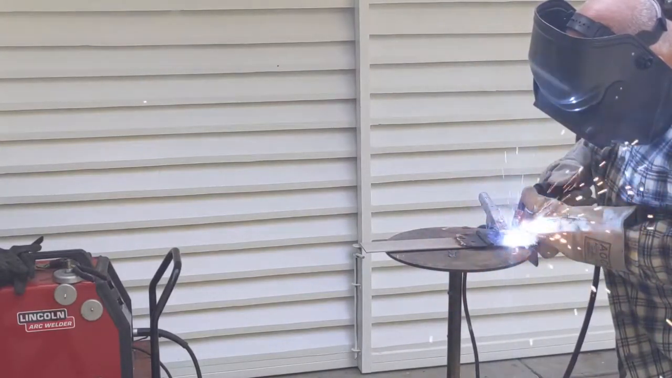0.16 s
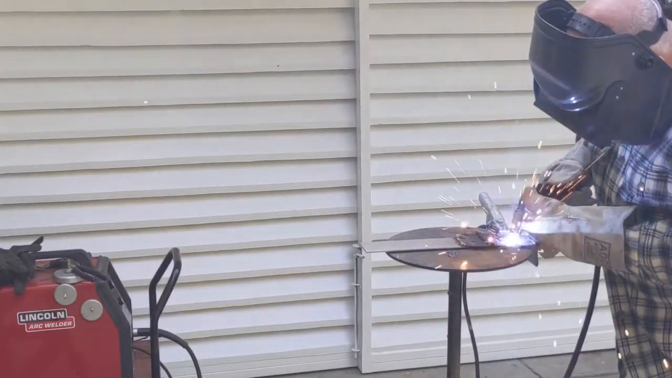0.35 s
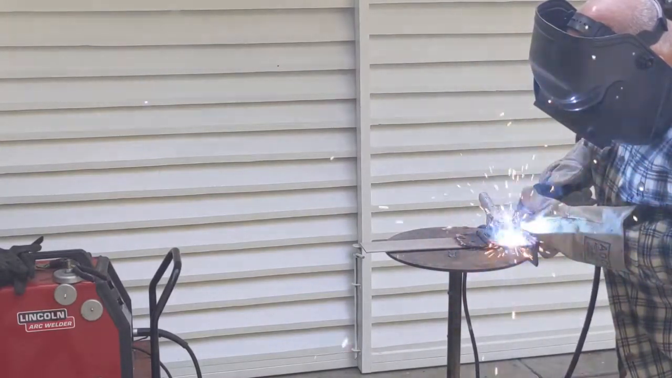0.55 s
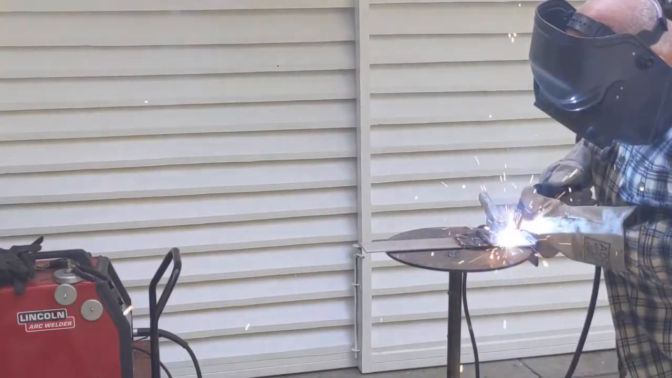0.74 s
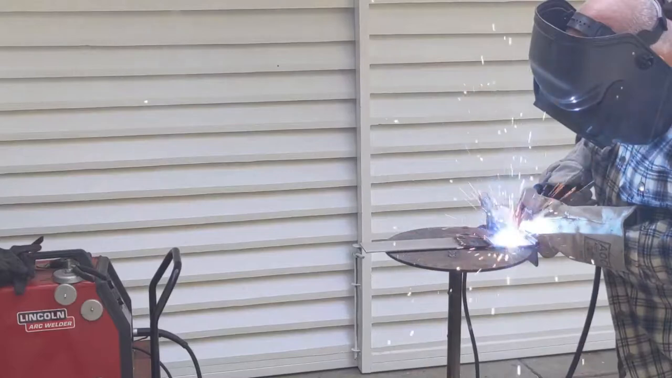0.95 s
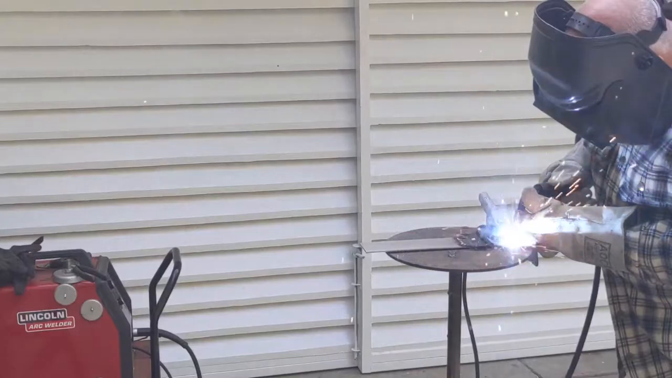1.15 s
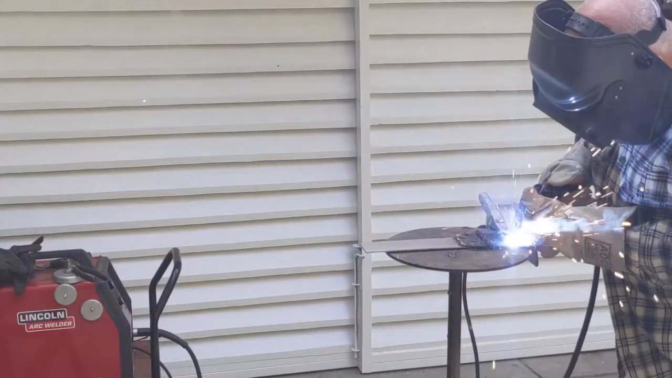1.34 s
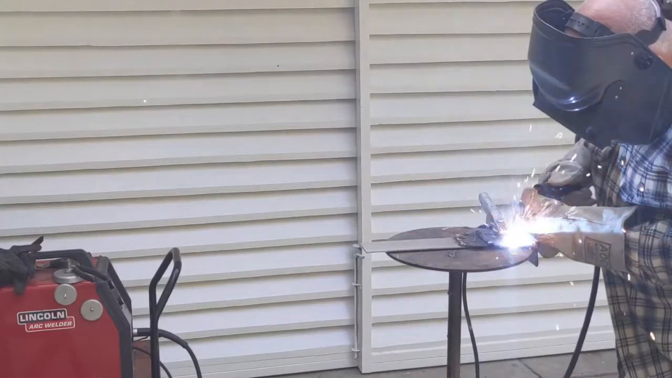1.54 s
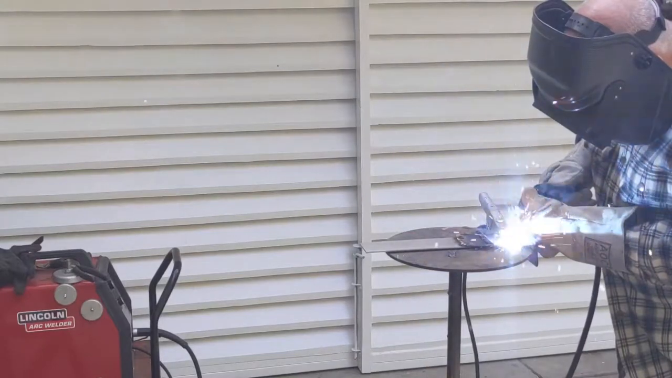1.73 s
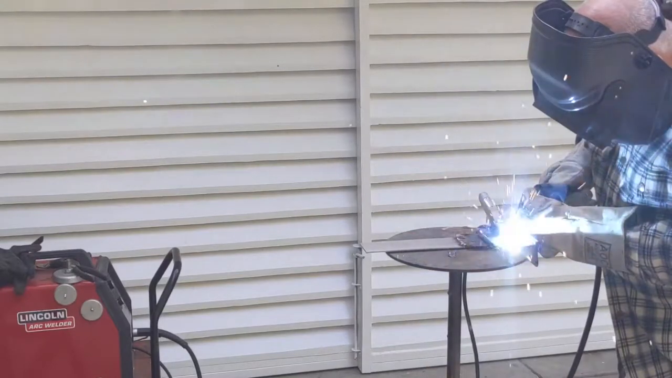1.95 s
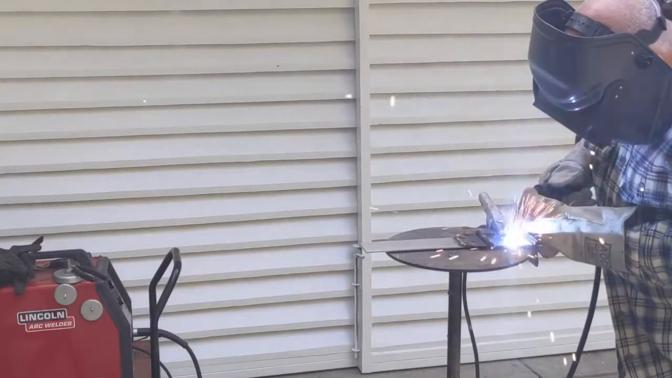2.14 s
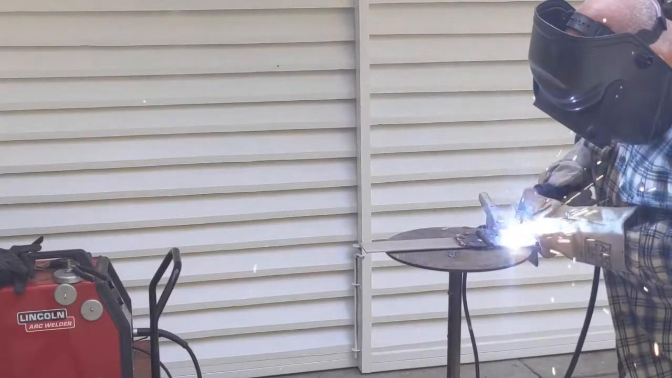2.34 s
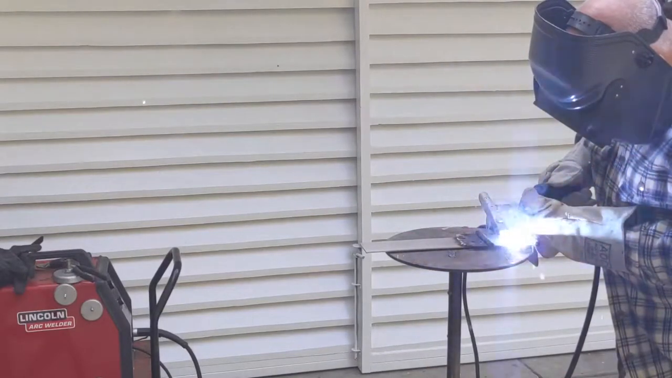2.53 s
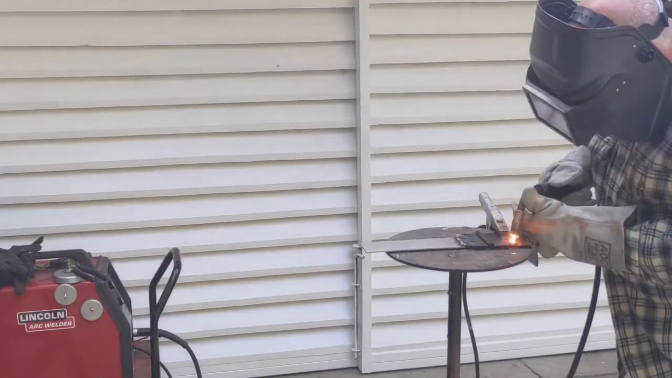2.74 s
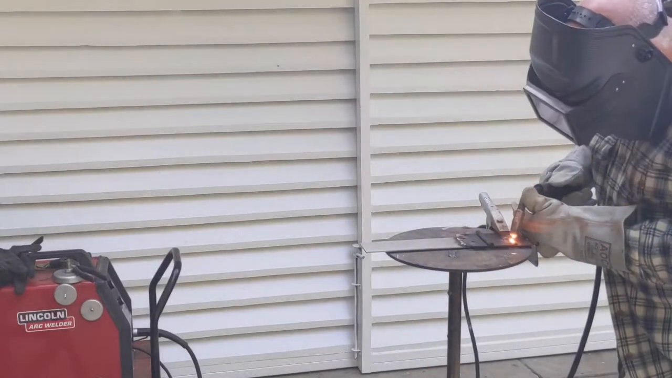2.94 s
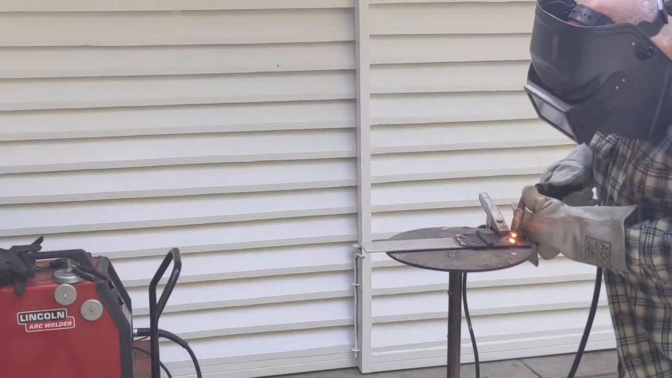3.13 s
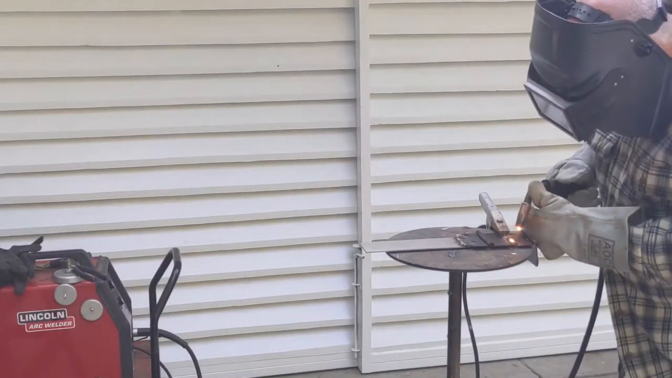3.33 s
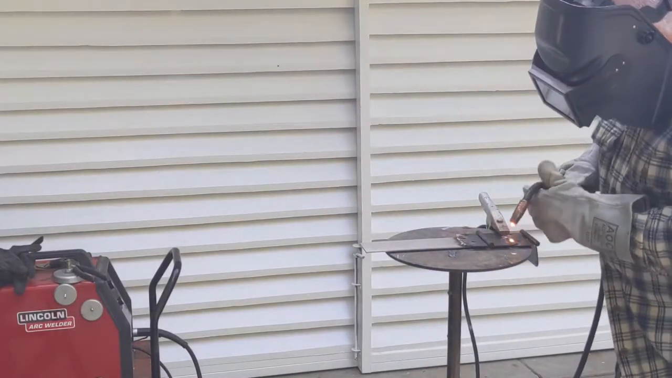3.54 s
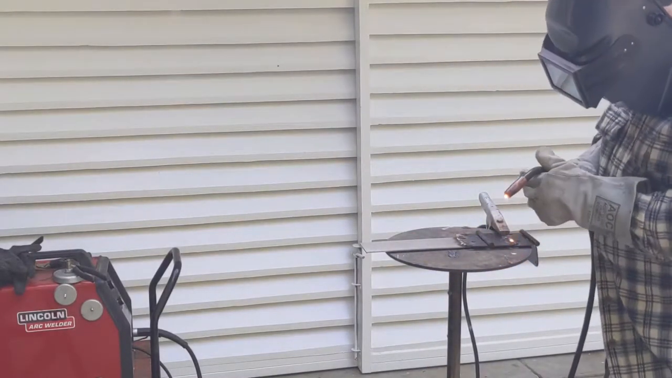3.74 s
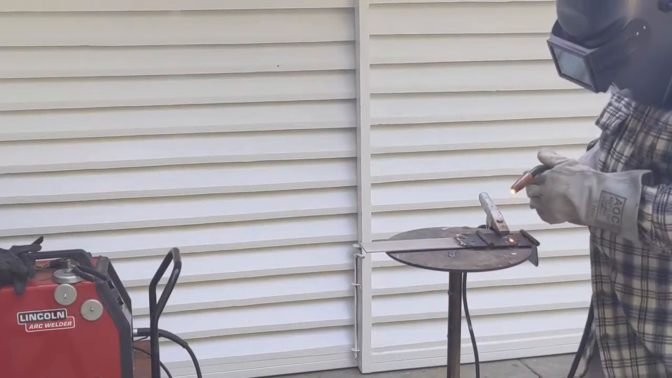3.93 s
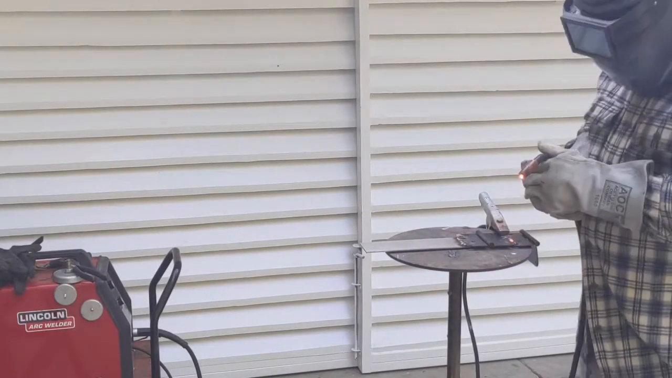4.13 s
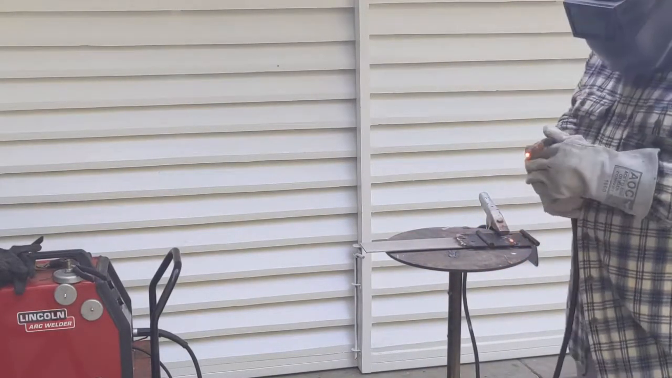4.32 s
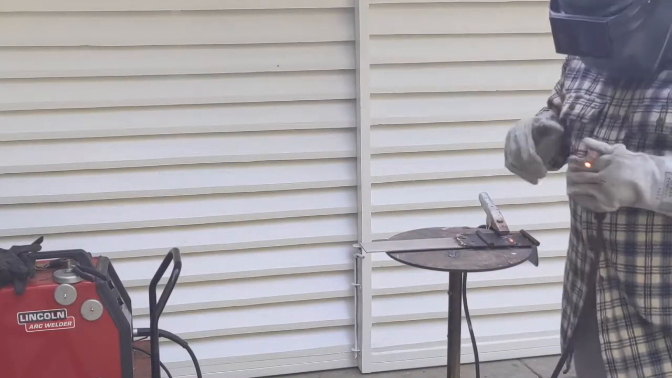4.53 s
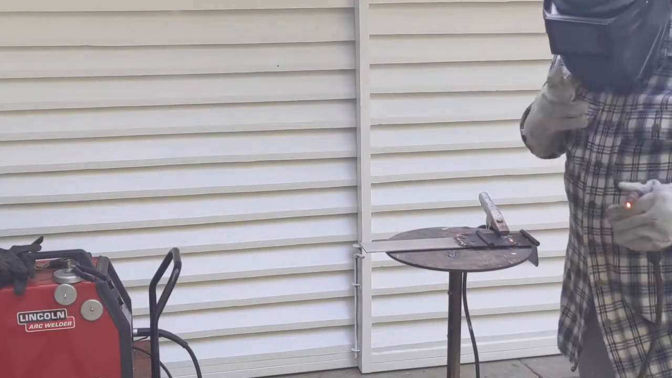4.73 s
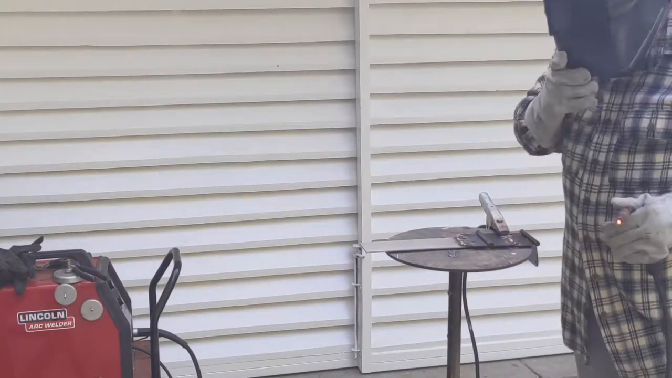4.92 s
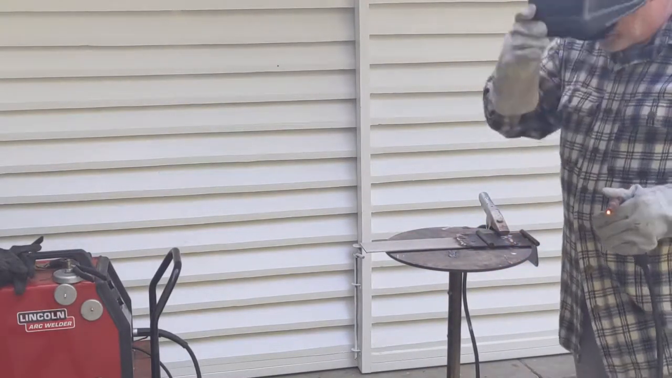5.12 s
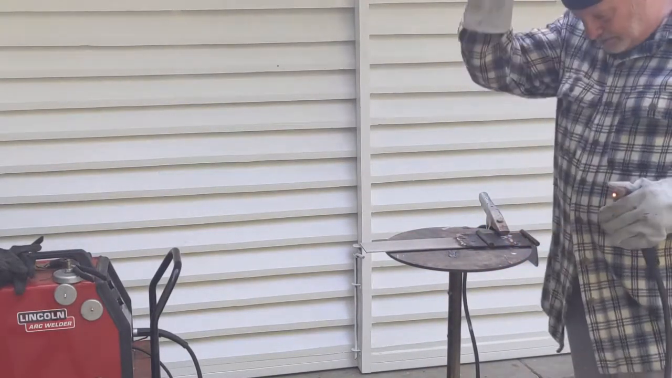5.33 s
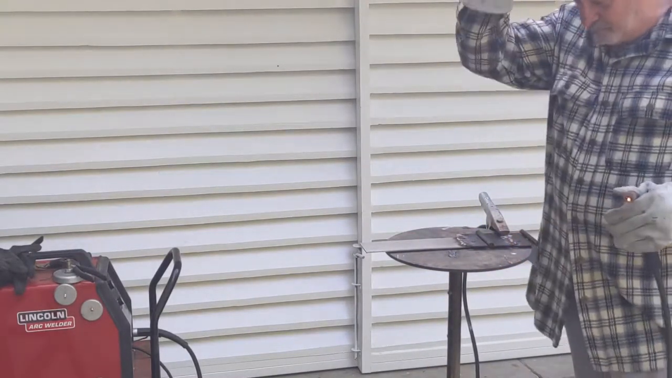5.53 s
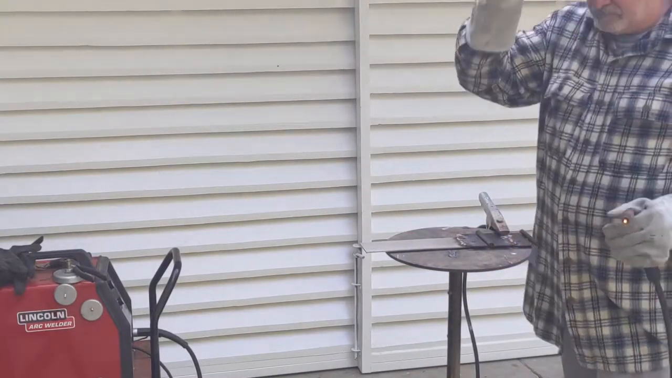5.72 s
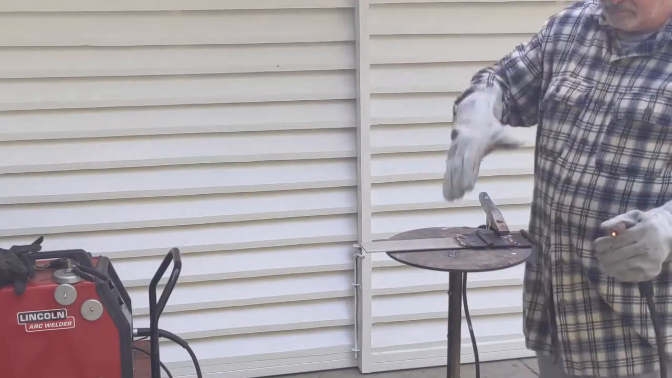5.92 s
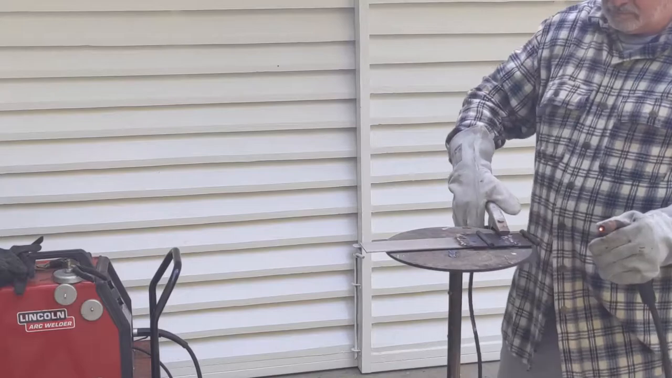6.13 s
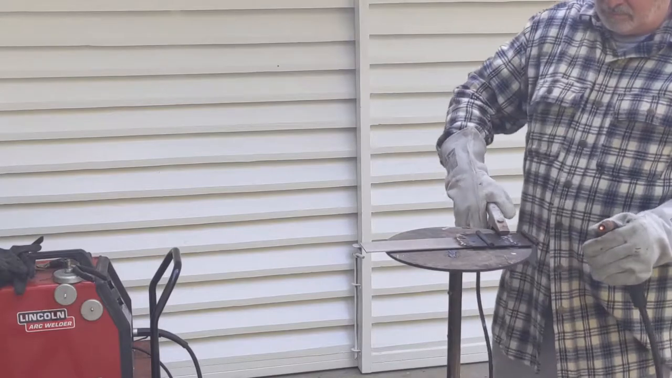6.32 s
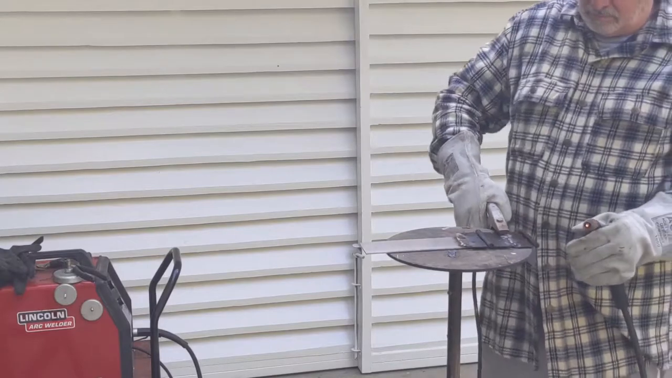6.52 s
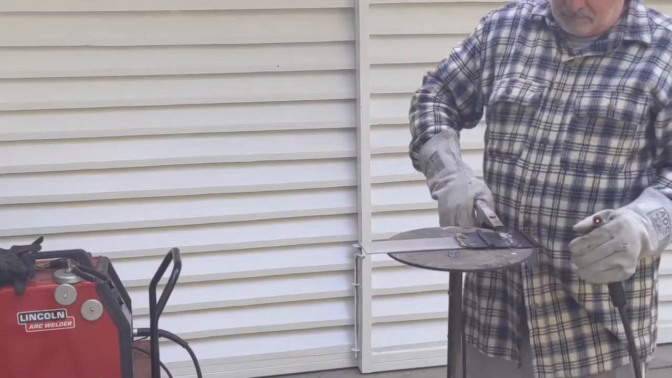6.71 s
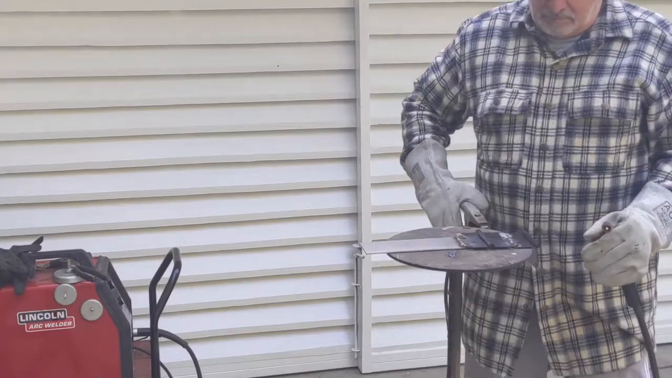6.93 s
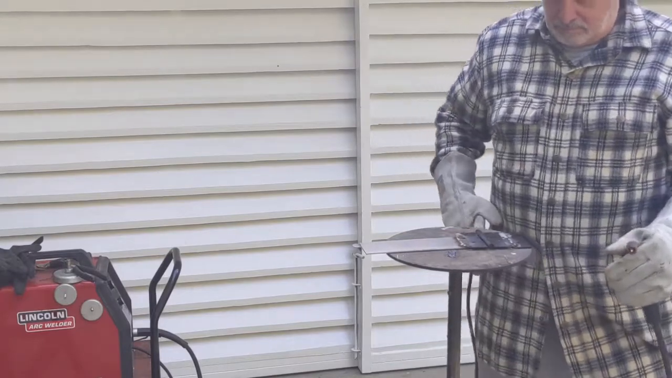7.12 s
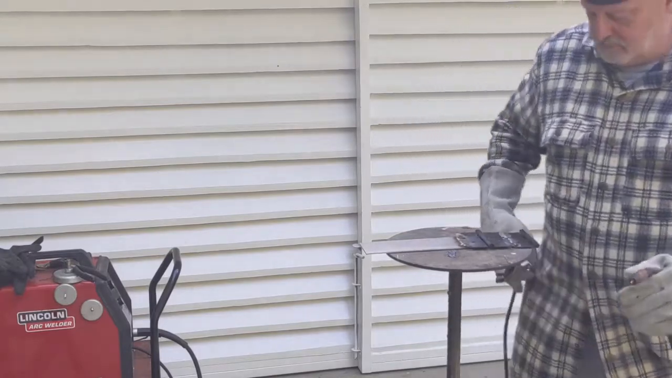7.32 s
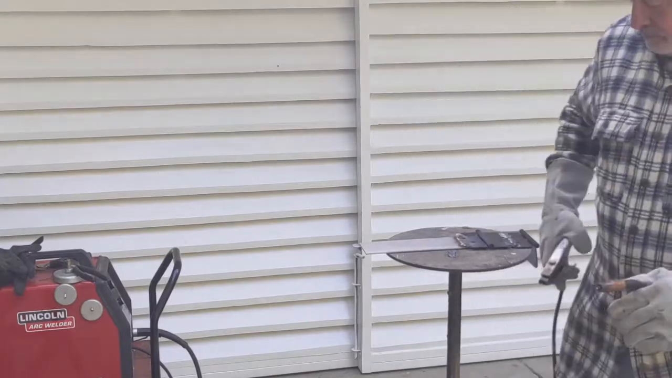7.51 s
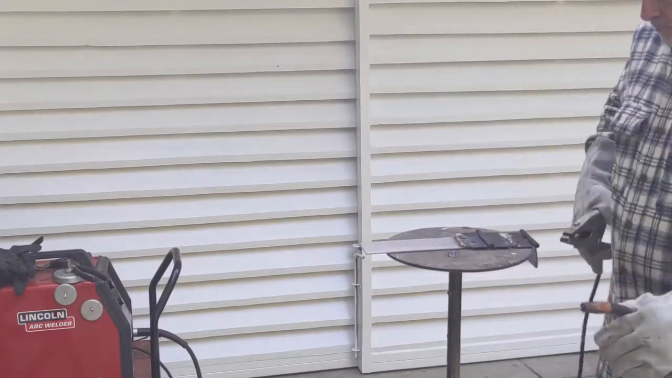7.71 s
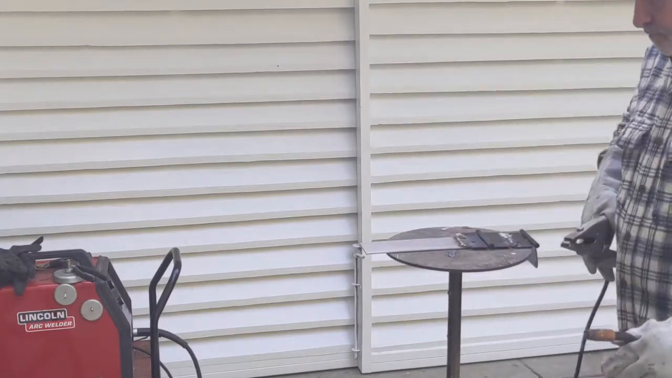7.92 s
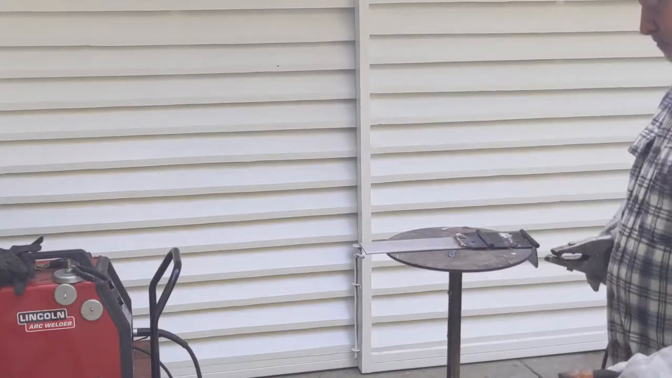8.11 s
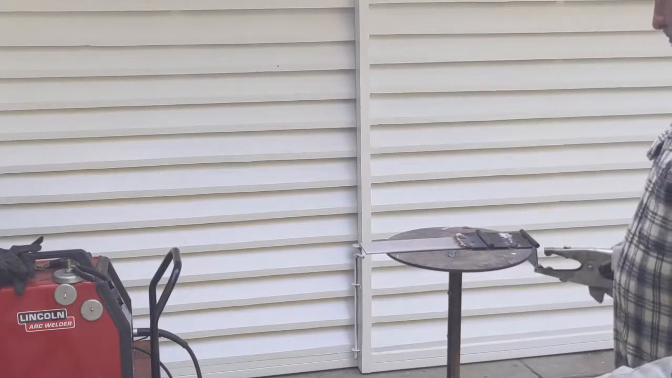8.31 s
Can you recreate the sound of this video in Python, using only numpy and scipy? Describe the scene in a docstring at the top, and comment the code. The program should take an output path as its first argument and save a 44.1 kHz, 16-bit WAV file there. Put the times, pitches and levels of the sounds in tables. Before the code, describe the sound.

A fierce, stuttering welding arc snaps and sizzles, then stops, leaving a steady machine fan, quiet gear handling, small metal ticks and faint bird chips.

```python
"""Outdoors, at a small steel table in front of a house wall: wire welding heard by a pair of microphones.
The wire short-circuits about 120 times a second, each time with a snap; the plasma sizzles, hot gas puffs low.
Then the welder's fan, there all along as blade tones over rushing air, speeds up and hums on.
Over it the helmet is pushed up and rattles, the earth clamp comes off and rings the table, gloves, cloth and
a shoe scuff, small metal ticks, a thin whistle sets in; far off, a bird chips in short rising tones."""
import sys
import numpy as np
from scipy import signal
from scipy.fft import rfft, irfft
from scipy.io import wavfile
from scipy.ndimage import uniform_filter1d

SR = 44100
rng = np.random.default_rng(int(sys.argv[2]) if len(sys.argv) > 2 else 0)


def store_pcm(level_fs):
    """Save levels as 16-bit WAV."""
    pcm = np.round(np.clip(level_fs, -1, 1) * 32767).astype(np.int16)
    wavfile.write(sys.argv[1], SR, np.atleast_2d(pcm).T)


N = 368676
TIME = np.arange(N) / SR

# echoes from the table top, the welder's body, the ground and the wall: (delay [ms], strength [gain])
ARC_ECHOES = [(.47, 0.074), (.74, 0.17), (1.15, 0.074), (3.95, 0.23), (5.1, 0.145), (6.85, 0.13),
              (11.4, 0.088), (12.5, 0.093), (12.95, 0.3), (16.9, 0.13), (18.1, 0.055)]
# phase by which the left microphone leads: (frequency [Hz], lead [rad])
ARC_LEFT_LEAD = [(300, 0), (1700, .35), (4200, 1.4), (6200, 2.2), (9000, 4.1), (12000, 6.1), (15000, 8.6)]
# balance of the arc between the microphones: (frequency [Hz], left minus right [dB])
ARC_BALANCE = [(60, 12.5), (200, 4), (1300, 5), (4200, 2), (7000, 0), (8200, -3.5), (10800, 0), (12500, -4),
               (13500, 10.5), (15300, 10.5)]
# colour of the fluttering gas: (frequency [Hz], relative level [dB])
FLUTTER_COLOUR = [(20, -12), (45, 12), (65, 16.5), (120, 5), (230, 13), (450, -5.5), (900, -4.5),
                  (3000, -92)]


def arc(scatter=0.016, smear_hz=7000, flutter_db=-2.5, eddy_db=-7.0):
    """The arc with its near echoes; the direct sound reaches the left microphone first."""
    burn = burning()
    crackle = snaps() + sizzle(burn)
    hz = np.fft.rfftfreq(N, 1 / SR)
    delay_ms, strength = np.transpose(ARC_ECHOES)
    channels = []
    for side in (0, 1):
        arrival_ms = delay_ms * (1 + scatter * rng.standard_normal(len(delay_ms)))  # echoes come from all sides
        echo = sum(g * np.exp(-2j * np.pi * hz * ms / 1000) for ms, g in zip(arrival_ms, strength))
        echo = echo / (1 + hz / smear_hz) ** .5  # duller than the direct sound
        direct = np.exp(-1j * side * read(ARC_LEFT_LEAD, hz))
        # part of the rumble differs between the microphones
        eddies = gain_of(eddy_db) * burn * noise(FLUTTER_COLOUR, N)
        channels.append(eddies + irfft(rfft(crackle) * (direct + echo), N))
    flutter = gain_of(flutter_db) * burn * noise(FLUTTER_COLOUR, N)  # the hot gas flutters between puffs
    bass = puffs() + flutter
    sound = np.array(channels) + yard(crackle, wet_db=-10) + bass + yard(bass, wet_db=-16.0)
    balance_db = np.outer([.5, -.5], read(ARC_BALANCE, hz))
    return irfft(rfft(sound) * gain_of(balance_db), N)


# a big drop hangs on the wire, then bursts with a loud pop: (time [s], level before the snap gain [dB])
POPS = [(.0804, -7.5), (0.1216, -15), (.417, -9.5), (0.8242, -5), (1.3625, -13), (1.425, -26.5),
        (1.5853, -9), (1.609, -11), (1.6555, -7.5), (1.861, -8.5), (2.0841, -11.5), (2.392, -14),
        (2.4342, -8)]
# colour of each snap: (frequency [Hz], relative level [dB])
SNAP_COLOUR = [(120, -25.5), (400, -1.5), (750, 3.5), (1300, 2), (1750, 2.5), (2050, -3), (2500, 3),
               (3050, 3), (3500, 0), (3950, 7), (4600, 2.5), (6000, 0.5), (8300, 5), (10500, 4.5),
               (12200, 6.5), (13500, -2.5), (15300, -1.5)]
# colour of the extra crack as a run lights: (frequency [Hz], relative level [dB])
RESTRIKE_COLOUR = [(120, -15), (400, 4), (900, -3.5), (2800, 0), (4500, 0), (7000, 2.5), (15000, -10.5)]


def snaps(snap_db=16.0, spit_db=-7, spit_s=0.0012, pinch_s=0.00063, restrike_db=9, hang_s=.015):
    """Each short circuit ends in a snap; the beat pauses around a pop; a new run burns off more wire, so
    its crack is fuller."""
    train, restrikes = short_circuits(), np.zeros(N)
    for s, db in POPS:
        train[round((s - hang_s) * SR):round((s + hang_s / 2) * SR)] = 0
        train[round(s * SR)] = gain_of(db)
    for start, _, db, _, _ in RUNS:
        if start > 0:
            restrikes[round(start * SR)] = gain_of(db)
    train = train + restrikes
    # the molten neck fizzes as it pinches off, and spits as it bursts
    t = np.arange(-200, 201) / SR
    fizz = np.exp(-abs(t) / np.where(t < 0, pinch_s, spit_s))
    spit = signal.oaconvolve(train, fizz, "same") * noise(SIZZLE_COLOUR, N)
    crack = signal.oaconvolve(restrikes, click(RESTRIKE_COLOUR))[:N]
    snap = signal.oaconvolve(train, click(SNAP_COLOUR))[:N]
    return gain_of(snap_db) * snap + gain_of(restrike_db) * crack + gain_of(spit_db) * spit


# runs of the arc, each struck with a crack; levels before the gains of their layers:
# (start [s], stop [s], crack [dB], snaps [dB], sizzle [dB])
RUNS = [(-.03, 0.091, -14, -12, -36), (0.1029, 0.334, -17.5, -12.5, -39),
        (.3926, 0.496, -7.5, -13.5, -38.5), (0.5261, 0.53, -9, -19, -35),
        (0.5948, 0.685, -7.5, -12.5, -41.5), (0.711, 0.727, -14, -20, -46), (.7732, 0.772, -8.5, -19, -32),
        (0.8052, 1.228, -10, -12.5, -39), (1.2514, 1.949, -8.5, -13.5, -36),
        (1.9764, 1.992, -14.5, -20.5, -35), (2.0487, 2.13, -8, -14.5, -36), (2.154, 2.16, -22, -22, -34),
        (2.222, 2.506, -11, -13.5, -38.5)]


def short_circuits(slow_start=.9, settle_beats=2.2, jitter=.08, wander=.07, spread_db=0.6, weak_share=0.22,
                   weak_db=-8.0, swell_db=1.05, swell_hz=6, count=120):
    """After each strike the beat starts slow and settles; it wanders, and some dips barely touch the pool."""
    train, beat = np.zeros(N), np.arange(count)
    dips = np.cumsum(dip_rate()) / SR  # running count of dips
    for start, stop, _, db, _ in RUNS:
        early, sway, size = rng.standard_normal((count, 3)).T
        weak = rng.random(count) < weak_share
        unevenness = jitter * early + wander * evened(uniform_filter1d(sway, size=6))
        gaps = (1 + slow_start * np.exp(-beat / settle_beats)) * np.exp(unevenness)  # in beats
        dip_count = np.interp(start, TIME, dips) + np.cumsum(gaps)
        s = np.interp(dip_count, dips, TIME) + min(start, 0)
        lit = (s > 0) & (s < stop)
        dip_db = db + spread_db * size + weak_db * weak
        train[np.round(s[lit] * SR).astype(int)] += gain_of(dip_db)[lit]
    return train * gain_of(swell_db * drift(swell_hz))


# how often the wire dips into the pool once the beat has settled: (time [s], short circuits [1/s])
DIP_RATE = [(0.0, 126.5), (0.65, 132.4), (0.93, 142), (1.05, 125), (1.38, 121), (1.48, 122.7), (1.94, 106),
            (2.32, 138), (2.5, 106.6)]


def dip_rate():
    """Short circuits per second over time, between the points of the table."""
    return np.interp(TIME, *np.transpose(DIP_RATE))


def burning(lead_s=0.0017, light_s=.007, die_s=.022, db_per_octave=8):
    """Strength of the arc: it lights around the crack, dies within milliseconds, burns harder with faster dips."""
    lit = np.zeros(N)
    for start, stop, _, _, db in RUNS:
        lighting = (1 + np.tanh((TIME - start + lead_s) / light_s)) / 2
        dying = (1 - np.tanh((TIME - stop) / die_s)) / 2
        lit += gain_of(db) * lighting * dying
    octaves = np.log2(dip_rate() / np.mean(DIP_RATE, axis=0)[1])
    return lit * gain_of(db_per_octave * octaves)


# colour of the hissing plasma and of the spitting neck: (frequency [Hz], relative level [dB])
SIZZLE_COLOUR = [(300, -46.5), (1000, -1), (2000, -1), (2700, 5), (4000, 0.5), (6300, 6.5), (8200, 3),
                 (9600, 7), (12200, 0), (13500, -5), (16000, -15)]


def sizzle(burn, hiss_db=5.0, grain_db=2, grain_hz=500):
    """The plasma hisses in fast uneven spurts."""
    spurts = noise(SIZZLE_COLOUR, N) * gain_of(grain_db * drift(grain_hz))
    return gain_of(hiss_db) * burn * evened(spurts)


# the big low puffs as the arc flares: (time [s], level before the puff gain [dB])
PUFFS = [(0.104, -7), (.394, -18), (0.531, -27.5), (.71, -4), (1.007, -34), (1.113, -24), (1.22, -23.5),
         (1.308, -9), (1.366, -11.5), (1.497, -12), (1.545, -22), (1.621, -9.5), (1.655, -4),
         (2.061, -19.5), (2.445, -17), (2.47, -7.5), (2.546, -26.5)]


def puffs(puff_db=-4.5, start_hz=430, end_hz=125, db_per_octave=32, sag_s=0.0042, decay_s=0.018,
          rise_s=0.00027, boom_lag_s=.008, boom_db=1, boom_hz=82, boom_s=.0105, lowest_hz=54):
    """A ball of hot gas swells and slows: a thump falling in pitch, higher when stronger; a deep boom follows."""
    out, t = np.zeros(N), np.arange(SR // 6) / SR
    boom = -gain_of(boom_db) * np.sin(2 * np.pi * boom_hz * t) * np.exp(-t / boom_s)
    for s, db in PUFFS:
        hz = end_hz + (start_hz - end_hz) * np.exp(-t / sag_s)  # for a puff of 0 dB in the table
        hz = hz * 2 ** (db / db_per_octave)
        envelope = np.exp(-t / decay_s) * (1 - np.exp(-t / rise_s))
        thump = np.sin(2 * np.pi * np.cumsum(hz) / SR) * envelope
        add(out, s, gain_of(db) * thump)
        add(out, s + boom_lag_s, gain_of(db) * boom)
    highpass = signal.butter(2, lowest_hz, "high", fs=SR, output="sos")
    return gain_of(puff_db) * signal.sosfilt(highpass, out)


# knocks of the plastic helmet:
# (time [s], rattle level [dB], t60 [s], brightness [dB per octave], boom of the shell relative to its modes [dB])
HELMET_KNOCKS = [(4.275, -12.5, 0.016, 4.5, -31), (4.279, -22, 0.029, 5.5, -45),
                 (4.285, -16.5, 0.03, 4, -32), (4.899, -21, 0.037, 3.5, -32),
                 (4.906, -35, 0.079, 4.5, -23.5), (5.174, -31, 0.093, 4.5, -33), (5.232, -44, 0.12, 5, -49)]
# colour of the helmet's rattle: (frequency [Hz], relative level [dB])
HELMET_COLOUR = [(150, -26), (330, 1), (480, 17.5), (750, -1), (1100, -1), (1600, -9.5), (2100, -12.5),
                 (3000, -19.5), (4000, -16.5), (6000, -29.5), (9500, -36.5), (13000, -44), (16000, -54)]
# hollow modes of the helmet's shell: (frequency [Hz], relative level [dB], t60 [s])
SHELL_MODES = [(469, 5, 0.036), (544, -1.5, 0.025), (602, -3.5, 0.076)]


def helmet():
    """Short rattles of the plastic, each with a hollow boom of the shell."""
    out, t = np.zeros(N), np.arange(SR // 4) / SR
    boom = sum(gain_of(db - 60 * t / t60) * np.sin(2 * np.pi * hz * t) for hz, db, t60 in SHELL_MODES)
    for s, db, t60, tilt_db, boom_db in HELMET_KNOCKS:
        rattle = gain_of(db - 60 * t / t60) * noise(HELMET_COLOUR, len(t), tilt_db)
        onset = 1 - np.exp(-t / 0.0019)
        add(out, s, (rattle + gain_of(boom_db) * boom) * onset)
    return out


# the clamp bumps the table: (time [s], ring relative to the modes [dB], scrape level [dB])
CLAMP_BUMPS = [(6.514, -47.5, -44), (6.631, -44.5, -45), (6.775, -36.5, -43.5)]
# modes of the steel table: (frequency [Hz], relative level [dB], t60 [s])
TABLE_MODES = [(874, -6, 0.23), (1253, -8.5, .1), (1450, -11, 0.65), (1890, -7, 0.097), (2400, -9, 0.16),
               (2710, -8, 0.11), (3240, -5, 0.23), (3730, -4.5, 0.15), (4398, -3, 0.12), (5670, -18, .22),
               (7100, -22, 0.22), (9458, -17, 0.27), (10000, -29, 0.23), (11400, -22, 0.14)]


def clamp(vary_db=1.5, detune=0.0098, bounce_s=0.015, bounce_db=-3.5, scrape_rise_s=.003, scrape_s=0.058,
          scrape_tilt_db=-0.6, count=3):
    """Every bump scrapes and bounces; it rings the table's modes, in other shares and a little off as the
    clamp shifts."""
    out, t = np.zeros(N), np.arange(SR // 2) / SR
    hz, mode_db, t60 = np.transpose(TABLE_MODES)[:, :, None]
    scrape_shape = (1 - np.exp(-t / scrape_rise_s)) * np.exp(-t / scrape_s)
    for s, db, scrape_db in CLAMP_BUMPS:
        add(out, s, gain_of(scrape_db) * scrape_shape * noise(RUB_COLOUR, len(t), scrape_tilt_db))
        for k in range(count):
            share, phase, shift = rng.standard_normal((3, len(hz), 1))
            ring = np.sin(2 * np.pi * (hz * (1 + detune * shift) * t + phase))
            ring_db = db + k * bounce_db + mode_db + vary_db * share - 60 * t / t60
            add(out, s + k * bounce_s, (gain_of(ring_db) * ring).sum(0))
    return out


# rubs of gloves, cloth and shoes:
# (time of the peak [s], level [dB], rise [s], fall [s], brightness [dB per octave])
RUBS = [(4.071, -53, 0.024, 0.032, -1.5), (4.788, -55, 0.019, 0.075, 1), (5.725, -41.5, 0.013, 0.018, 0.3),
        (7.523, -53.5, 0.012, 0.065, -1), (7.7, -41, 0.034, 0.022, -3), (7.785, -35, 0.052, 0.028, -1.6),
        (7.959, -53.5, 0.029, 0.037, -0.5), (8.15, -42.5, 0.0046, 0.024, -2.5)]
# colour of the rubs and of the clamp's scrape: (frequency [Hz], relative level [dB])
RUB_COLOUR = [(200, -22), (650, -4.5), (1020, -2.5), (1900, -9), (2900, -5.5), (3600, -11), (5000, -2.5),
              (7000, -10), (10000, -16.5), (13000, -18), (16000, -47)]


def rubs(grit_db=2.5, grit_hz=400):
    """Gritty strokes that swell and fade."""
    out, t = np.zeros(N), np.arange(-SR // 4, SR // 4) / SR
    for s, db, rise, fall, tilt_db in RUBS:
        stroke = np.exp(-.5 * (t / np.where(t < 0, rise, fall)) ** 2)
        add(out, s + t[0], gain_of(db) * stroke * noise(RUB_COLOUR, len(t), tilt_db))
    return out * evened(gain_of(grit_db * drift(grit_hz)))


# small dry ticks of cooling metal and of the clamp's jaws: (time [s], level [dB], t60 [s], centre [Hz])
TICKS = [(2.69, -41, 0.14, 1280), (3.098, -51, .012, 10800), (3.251, -46.5, 0.021, 5600),
         (5.543, -47, 0.011, 7160), (5.949, -51, 0.013, 9020), (6.937, -35.5, 0.1, 10300),
         (6.939, -36.5, 0.078, 3180), (7.979, -46, 0.023, 12200), (8.141, -37, 0.1, 5560),
         (8.335, -57, 0.045, 9900)]


def ticks(skirt_db=-14):
    """Dry noise bursts about two octaves wide, dying at once."""
    out, t = np.zeros(N), np.arange(SR // 4) / SR
    for s, db, t60, hz in TICKS:
        low_side = [(hz / 8, 2 * skirt_db), (hz / 2, skirt_db / 2)]
        high_side = [(hz * 1.47, skirt_db), (hz * 8, 3 * skirt_db)]
        colour = low_side + [(hz, 0)] + high_side
        add(out, s, gain_of(db - 60 * t / t60) * noise(colour, len(t)))
    return out


def squeak(s=8.205, hz=12500, db=-61, swell_s=0.014):
    """A thin, very high, unsteady whistle sets in and stays."""
    whistle = np.sin(2 * np.pi * np.cumsum(hz + 90 * drift(300)) / SR)
    return gain_of(db) * whistle * (1 + np.tanh((TIME - s) / swell_s)) / 2


# tones of the fan at full speed: (frequency [Hz], rms level before the throb [dB])
FAN_TONES = [(118.4, -56), (242.4, -49), (484.8, -56.5), (727.2, -61)]
# colour of rushing air and outdoor rumble: (frequency [Hz], relative level [dB])
AIR_COLOUR = [(24, -29.5), (42, -2), (60, 9.5), (87, 3.5), (102, 1.5), (150, 2.5), (280, -5.5), (470, -9.5),
              (600, -6.5), (700, -15.5), (1050, -18), (2000, -25.5), (2700, -26.5), (4000, -32),
              (10000, -39), (16000, -47.5)]
# likeness of the air at the two microphones: (frequency [Hz], coherence [0 to 1])
AIR_LIKENESS = [(60, 1), (130, 0.66), (290, 0.46), (640, 0.97), (1400, 0.33), (3000, 0)]


def fan(air_db=-45.5, waver=0.001356, throb_db=1.76, right_db=1, sag=.125, free_s=2.54, recover_s=0.16):
    """Blade tones over rushing air; the welding current drags the fan down, it speeds up once the arc is out."""
    drag = sag * np.exp(-np.maximum(TIME - free_s, 0) / recover_s)
    speed = 1 - drag + waver * drift(4.24)  # 1 is full speed
    turning = np.cumsum(speed) / SR
    tones = np.zeros(N)
    for hz, db in FAN_TONES:
        level = np.sqrt(2) * gain_of(db + throb_db * drift(3.6))
        tones += level * np.sin(2 * np.pi * (hz * turning + rng.random()))
    same = np.clip(read(AIR_LIKENESS, np.fft.rfftfreq(N, 1 / SR)), -1, 1)
    left = noise(AIR_COLOUR, N)
    right = irfft(same * rfft(left) + np.sqrt(1 - same ** 2) * rfft(noise(AIR_COLOUR, N)), N)
    air = gain_of(air_db) * np.array([left, right])
    return speed ** 3 * (tones + air) * gain_of([[0], [right_db]])


# phrases of a small bird: (time [s], level before echo [dB], pitch that it climbs to [Hz], chips [count])
BIRD_PHRASES = [(2.885, -63, 8670, 2), (3.12, -68, 8750, 1), (3.686, -62.5, 8780, 3), (4.475, -69, 8850, 1),
                (4.924, -62, 8680, 3), (6.095, -72, 7900, 1), (6.23, -75, 7950, 1)]


def bird(length_s=0.044, gap_s=.075, climb_hz=600, climb_chips=0.63, sweep_hz=950, bend_s=0.027, burr_hz=250,
         right_db=4):
    """Thin chips at an even pace, the first one lower; each slides upward; far off, it is mostly echo."""
    out, t = np.zeros(N), np.arange(round(length_s * SR)) / SR
    burr = burr_hz * drift(500)  # roughens the pitch
    envelope = signal.windows.tukey(len(t), .6)
    for start, db, top_hz, chips in BIRD_PHRASES:
        for k in range(round(chips)):
            s = start + k * gap_s
            chip_top_hz = top_hz - climb_hz * np.exp(-k / climb_chips)
            hz = chip_top_hz - sweep_hz * np.exp(-t / bend_s) + burr[round(s * SR):][:len(t)]
            add(out, s, gain_of(db) * envelope * np.sin(2 * np.pi * np.cumsum(hz) / SR))
    return (out + yard(out, wet_db=4.0)) * gain_of([[-right_db / 2], [right_db / 2]])


# how long the yard rings: (frequency [Hz], t60 [s])
YARD_T60 = [(100, 0.1177), (1000, 0.21), (4000, 0.53), (10000, 0.6), (16000, 0.55)]


def yard(x, wet_db, onset_s=0.002):
    """Diffuse echo of walls and fences, different at each microphone, each band dying at its own speed."""
    hz, t, z = signal.stft(rng.standard_normal((2, SR)), SR, nperseg=256)
    decay = gain_of(-60 * t / read(YARD_T60, hz)[:, None])
    tail = signal.istft(z * decay, SR, nperseg=256)[1]
    tail = tail * (1 - np.exp(-(np.arange(tail.shape[1]) / SR / onset_s) ** 2))
    tail = tail / np.linalg.norm(tail[0])
    return gain_of(wet_db) * signal.fftconvolve(x[None], tail, axes=1)[:, :N]


def gain_of(db):
    """Decibels to gain."""
    return 10 ** (np.asarray(db) / 20)


def evened(x):
    """Scales to an rms of 1."""
    return x / np.sqrt(np.mean(x ** 2) + 1e-20)


def read(points, hz):
    """Reads (frequency [Hz], value) points on a log-frequency axis."""
    f, value = np.transpose(points)
    return np.interp(np.log(hz + 1), np.log(f + 1), value)


def add(mix, s, sound):
    """Adds a sound into the mix at time s."""
    part = mix[..., max(round(s * SR), 0):][..., :sound.shape[-1]]
    part += sound[..., :part.shape[-1]]


def noise(colour, size, tilt_db=0):
    """Noise of the given colour with an rms of 1, tilted by so many dB an octave."""
    hz = np.fft.rfftfreq(size, 1 / SR)
    colour_db = read(colour, hz) + tilt_db * np.log2(hz + 1)
    return evened(irfft(rfft(rng.standard_normal(size)) * gain_of(colour_db), size))


def drift(rate_hz):
    """Random wander, low-passed around rate_hz, with an rms of 1."""
    lowpass = np.exp(-(np.fft.rfftfreq(N, 1 / SR) / rate_hz) ** 2)
    return evened(irfft(rfft(rng.standard_normal(N)) * lowpass, N))


def click(colour, size=2048):
    """The sharpest causal (minimum-phase) pulse of that colour, with energy 1."""
    log_gain = np.log(gain_of(read(colour, abs(np.fft.fftfreq(size, 1 / SR)))))
    pulse = np.fft.ifft(np.exp(np.conj(signal.hilbert(log_gain)))).real[:size // 2]
    return pulse / np.linalg.norm(pulse)


def scene(right_db=1, lag_ms=.1):
    """The weld, then the tidying up beside the table, over the fan and the bird."""
    handling = helmet() + ticks() + clamp() + rubs() + squeak()
    # the handling reaches the right microphone a little later, and a little louder
    lag = np.exp(-2j * np.pi * np.fft.rfftfreq(N, 1 / SR) * lag_ms / 1000)
    later = irfft(rfft(handling) * lag, N)
    handling = np.array([handling, later]) + yard(handling, wet_db=-11)
    handling = handling * gain_of([[-right_db / 2], [right_db / 2]])
    return arc() + fan() + handling + bird()


def record(dry, edge_hz=16050):
    """Peaks beyond full scale are clipped; then a steep low-pass takes off the highest treble."""
    lowpass = signal.firwin(401, edge_hz, window=("kaiser", 8), fs=SR)
    return signal.oaconvolve(np.clip(dry, -1, 1), lowpass[None], "same")


dry = scene()
out = record(dry)
store_pcm(out)
```